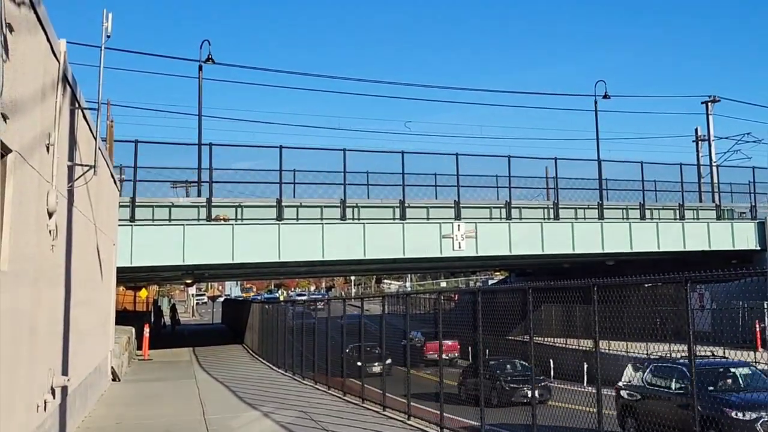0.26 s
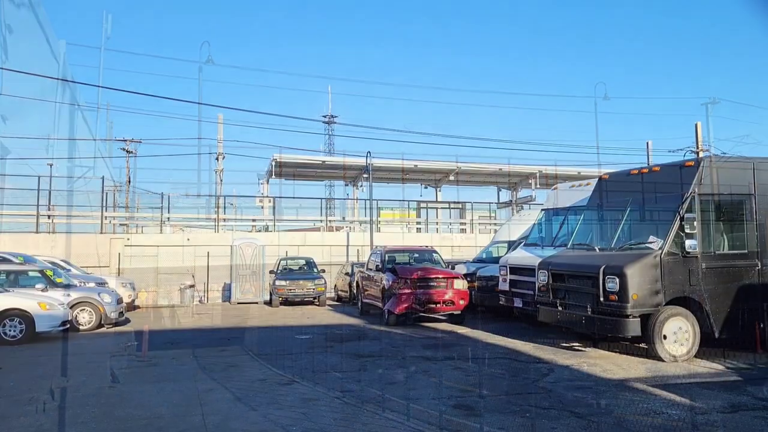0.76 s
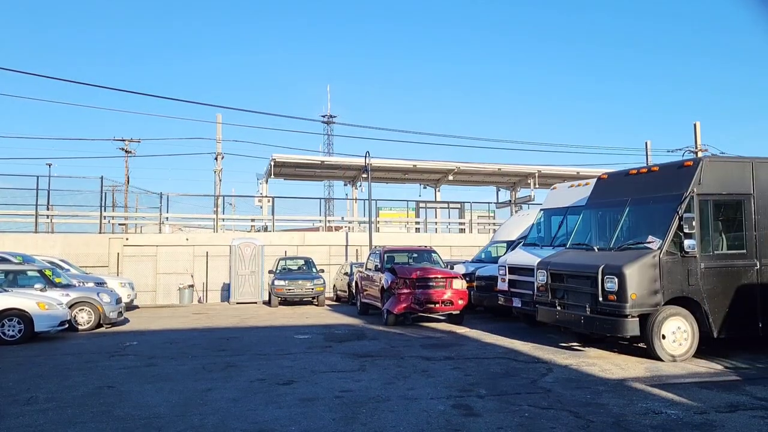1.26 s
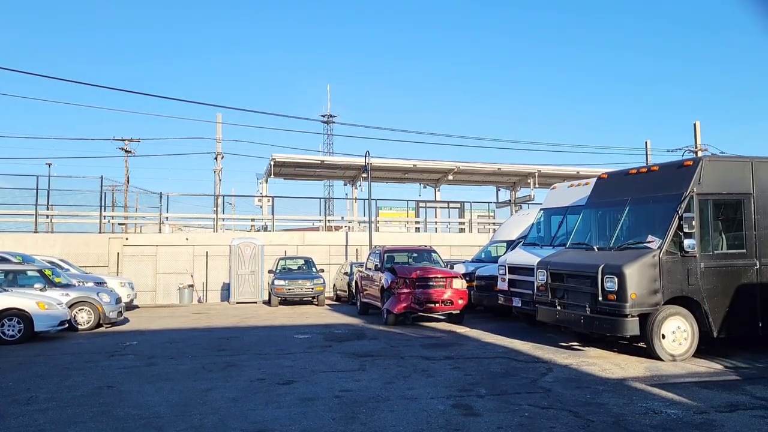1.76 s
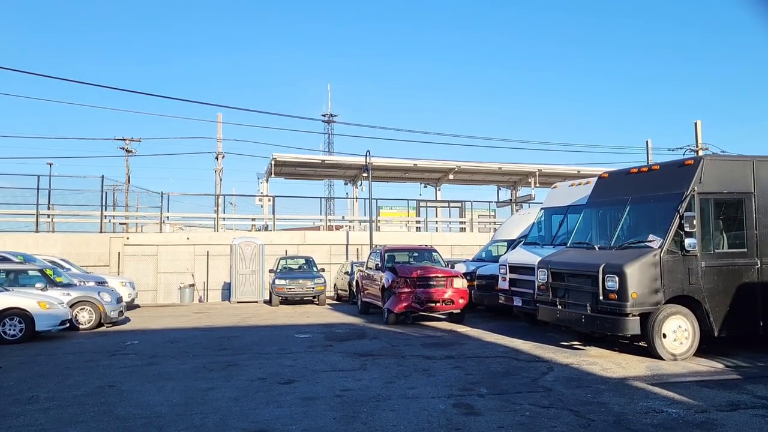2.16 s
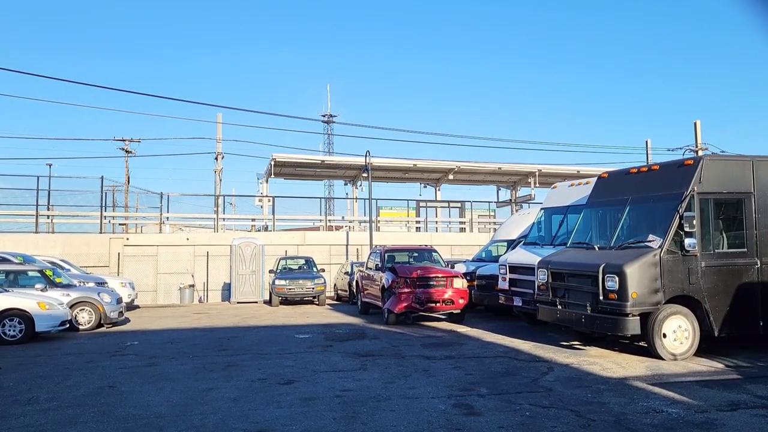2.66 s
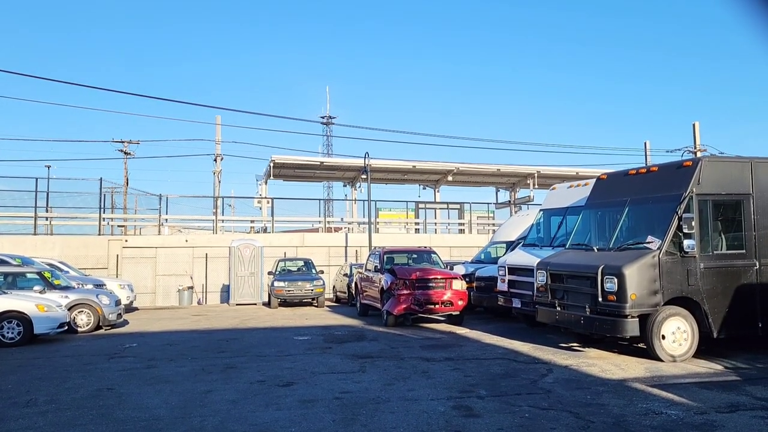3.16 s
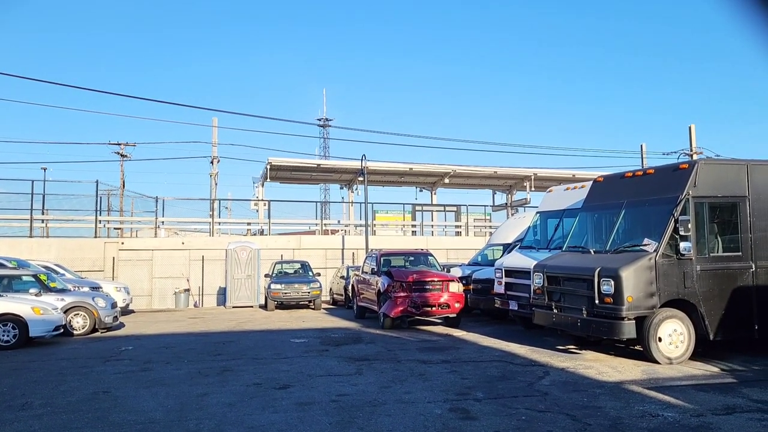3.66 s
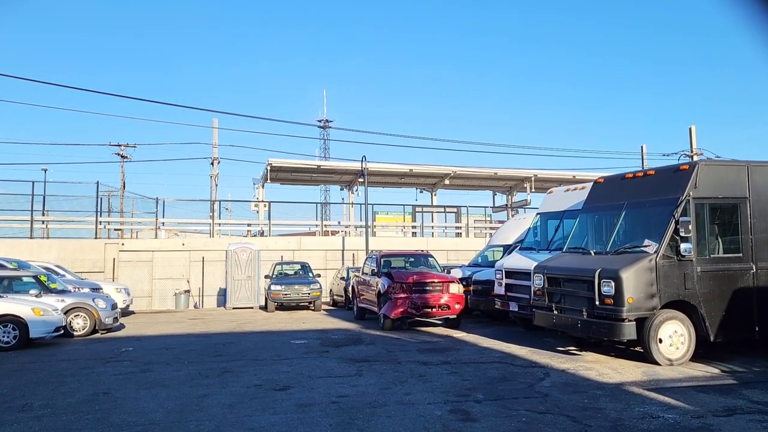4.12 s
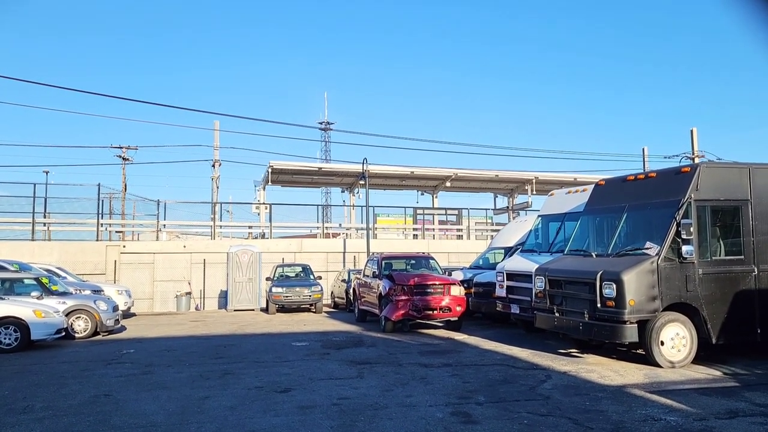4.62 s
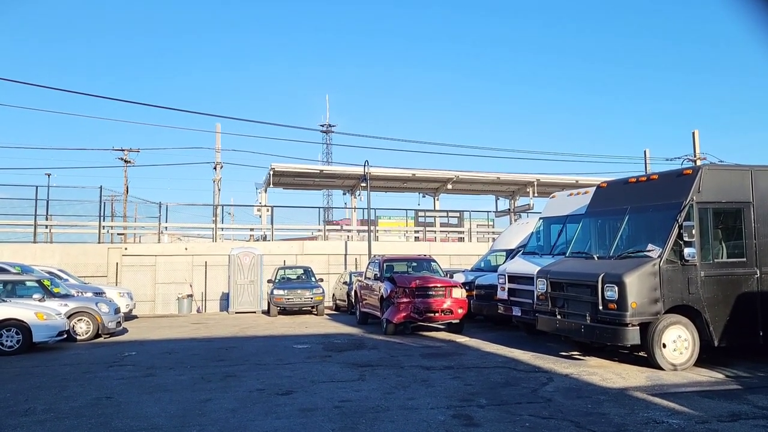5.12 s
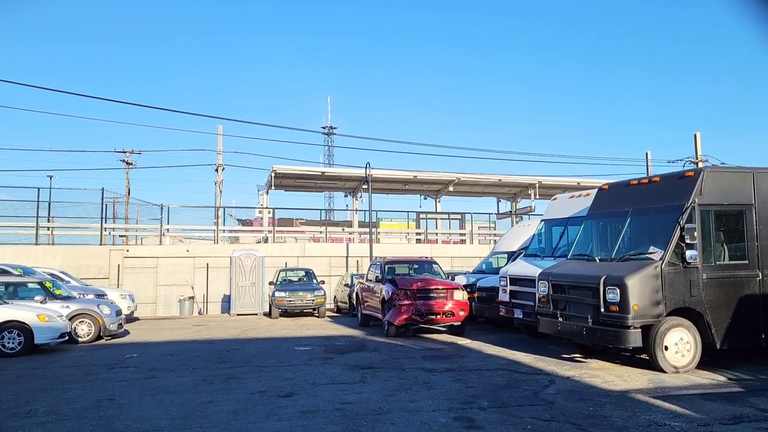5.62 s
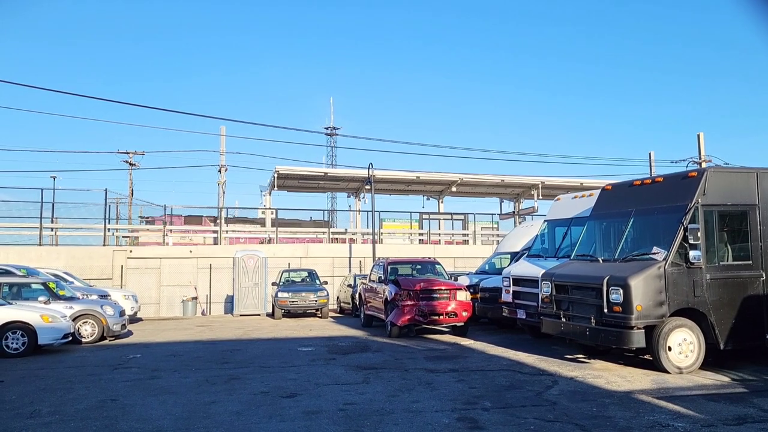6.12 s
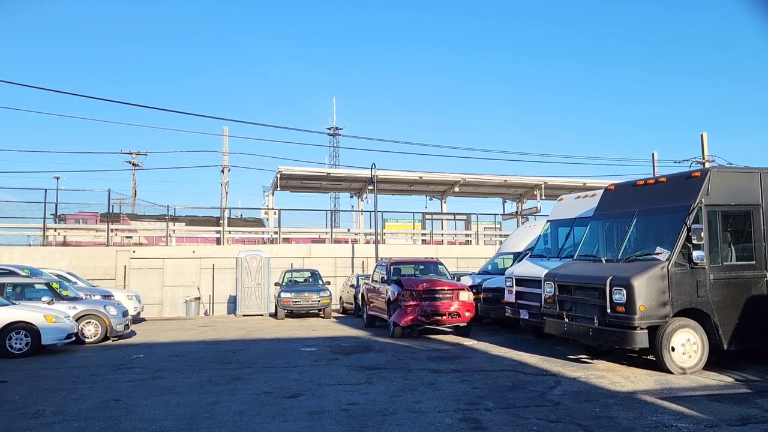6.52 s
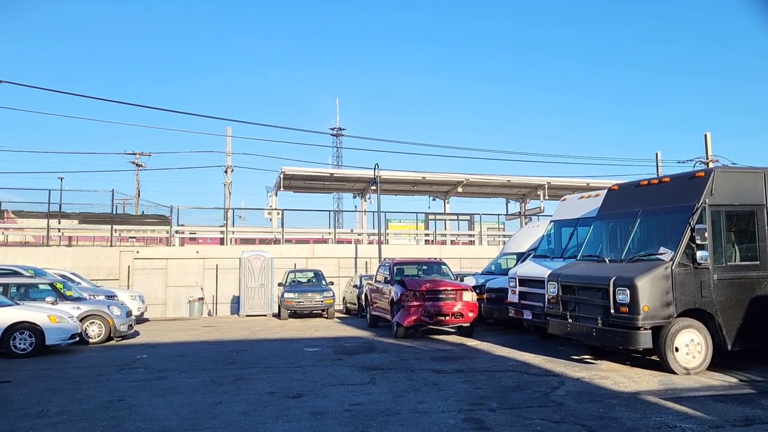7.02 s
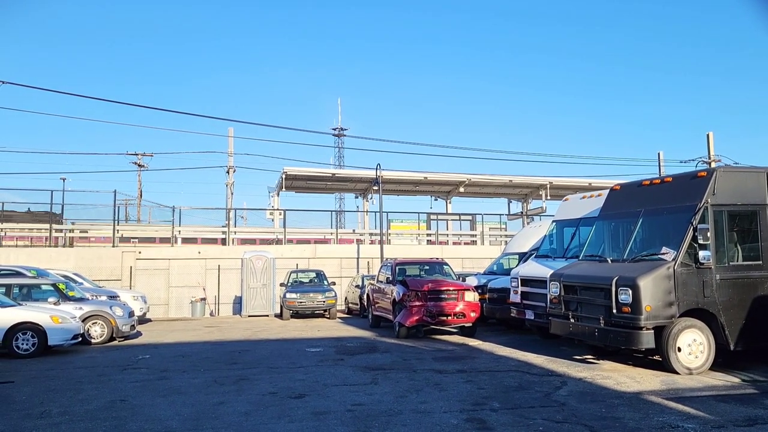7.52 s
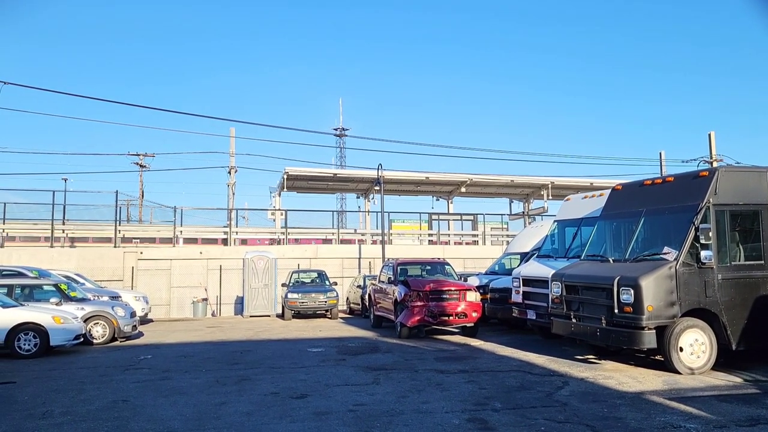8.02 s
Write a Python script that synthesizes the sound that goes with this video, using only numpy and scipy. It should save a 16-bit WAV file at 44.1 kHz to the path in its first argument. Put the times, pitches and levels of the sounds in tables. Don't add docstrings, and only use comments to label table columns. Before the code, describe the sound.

Street noise under a bridge gives way to a low beating diesel train, an early burst of compressed air, then a growing broadband roar.

```python
import sys
import numpy as np
from scipy import signal
from scipy.io import wavfile
from scipy.ndimage import uniform_filter1d

SR = 44100
rng = np.random.default_rng(int(sys.argv[2]) if len(sys.argv) > 2 else 0)


def output_pcm(signal):
    pcm = np.clip(np.atleast_2d(signal).T, -1, 1) * 32767
    wavfile.write(sys.argv[1], SR, np.round(pcm).astype(np.int16))


def nominal_scale(level):
    x = np.asarray(level, float) / 20
    return 10 ** x


N = 365148

HOP = 256
FRAMES = np.arange(N // HOP + 5) * HOP / SR
BINS = np.fft.rfftfreq(4 * HOP, 1 / SR)
TIME = np.arange(N) / SR

# t/s, nearness/0-1, lag of left port behind right/samples
PASSAGE = [
    (0, 0.25, 10),
    (3, 0, 13.5),
    (4.5, 0.36, 7.5),
    (5.5, 0.53, 0.5),
    (6.5, 0.9, -3.5),
    (8.28, 0.38, -11.5),
]
# f/Hz, likeness/0-1
PORT_LIKENESS = [(60, 0.69), (125, 0.98), (250, 0.89), (500, 0.83), (1000, 0.53), (2000, 0.1), (4000, 0.22),
                 (12000, 0.2)]
# f/Hz, left minus right/dB
PORT_BALANCE = [(60, 1.5), (99, 1.0), (160, 0.5), (270, 0.5), (450, 0.5), (740, 1.0), (1220, -1.0),
                (2010, -2.0), (3330, 2.5), (5500, 2.0), (9080, 10.5), (15000, -0.5)]
# f/Hz, level/dB
AMPLIFIER_HISS = [(7000, -128), (10000, -113), (12000, -111), (16000, -112)]
# t/s, depth/dB, length/s
GUARD_DIPS = [(1.322, 5, .007), (1.343, 2, .01), (1.37, 7, .01), (1.88, 4, .008), (2.107, 8, .009),
              (2.262, 7, .009), (2.3, 6, .012), (2.32, 3.5, .01), (2.48, 4, .008), (2.617, 4, .006),
              (4.55, 6, .011)]

# f/Hz, level/dB per Hz
STREET_COLOUR = [(40, -37), (90, -8), (150, -16.5), (300, -21.5), (600, -26.5), (1000, -32.5), (1500, -36),
                 (2000, -36), (4000, -41.5), (8000, -52.5), (10000, -65.5), (13000, -63.5), (14500, -60),
                 (16000, -75)]
STREET_DB, STREET_SAG_DB, STREET_DROP_DB = -30.5, 7.5, 9.5
TYRE_DB, TYRE_SAG_DB = -26.5, 2.5
TRUCK_HZ, TRUCK_CLIMB_HZ, TRUCK_TOP_HZ = 14.05, 1.75, 15.6
# order, peak t/s, level/dB, rise/s, fall/s
TRUCK_ORDERS = [(6.12, .55, -25, .7, .4), (10, .2, -25.5, .3, .65), (11, .2, -30, .3, .85),
                (16.2, .62, -37, .22, .25), (20, .6, -42, .3, .35)]
# f/Hz, level/dB, faded out at t/s
BRIDGE_DRONES = [(121, -27, .6), (229, -28, .52), (78, -30, .3)]

# peak t/s, level/dB, rise/s, fall/s
RUSTLES = [(0.98, -74, 0.051, .035), (1.374, -64, 0.25, .04), (1.426, -67, .01, .03),
           (1.554, -64, 0.11, 0.079), (1.7, -79, .06, .25), (2.15, -84, .016, .03), (6.9, -68, .25, .2)]
# t/s, peak level/dB, left minus right/dB
TICKS = [(0.9472, -52, 9.5), (0.9827, -56, 9.0), (1.4262, -46, 2.5), (1.5494, -57, -10.0),
         (1.7265, -58, 4.0), (3.1274, -70, 1.5), (5.3063, -58, 3.0)]

BLAST_AT, BLAST_DB = 2.622, -33.5
# f/Hz, level/dB per Hz
BLAST_COLOUR = [(900, -12), (1400, -9), (2100, -5), (3200, -9), (4300, -12.5), (5600, -18), (7200, -22),
                (8200, -12), (9200, -34), (12000, -23.5), (14500, -21), (16000, -23)]
# f/Hz, t60/s
BLAST_DECAY = [(1500, 1.2), (3000, 1), (5500, 0.53), (8500, 0.61), (12000, 0.37), (16000, .22)]
# t/s, peak level/dB, f/Hz, t60/s
VALVE_KNOCKS = [
    (2.6243, -24, 2100, .014),
    (2.6243, -28, 1600, .016),
    (2.6243, -26, 2700, .012),
    (2.6243, -29, 3500, .012),
    (3.076, -33, 2150, .035),
    (3.077, -42, 2700, .03),
]

# t/s, level under its peak/dB
ROAR_LOUDNESS = [(0.9, -11.5), (1.6, -11), (2.0, -13), (2.6, -11.5), (3.2, -10), (3.9, -8.5), (4.4, -5.5),
                 (5.0, -6), (5.7, -4.5), (6.1, -3), (6.4, -0.4), (6.7, -1.5), (7.3, -1.34), (7.8, -0.64),
                 (8.25, -2)]
# f/Hz, level/dB per Hz
NEAR_COLOUR = [(40, -14.5), (70, -19), (120, -17), (200, -21.5), (416, -26.5), (936, -22.5), (1190, -32.5),
               (2550, -36), (4250, -38), (8400, -65), (9000, -70), (12800, -84), (13300, -90), (16000, -94)]
# f/Hz, level/dB per Hz
FAR_COLOUR = [(40, -29), (70, -21.5), (123, -39), (200, -35), (363, -36), (695, -37), (1000, -44),
              (1230, -48.5), (1480, -46), (3250, -57.5), (5200, -70), (5700, -76.5), (8400, -87),
              (9200, -104)]
# f/Hz, width/Hz, lift/dB
ROAR_PEAKS = [(1030, 180, 4.5), (1395, 223, 11.5), (1926, 410, 6.5), (3980, 3840, 8.5), (5160, 280, 3.5),
              (7560, 1800, 7)]
# level at the peak/dB, slope/dB per dB of loudness
ROAR_LAYERS = [
    (-27, 1.0961),
    (-36, 0.98),
    (-51, 1.68),
    (-71, 1.98),
]
# peak t/s, level/dB, rise/s, fall/s
FAN_SURGES = [(3.1, -2, .3, 0.22), (4.05, -2.5, 0.33, 0.18), (4.5, -2.5, .1, .15), (5.05, -3, .35, 0.65),
              (5.75, -0.5, 0.31, 0.16), (6.9, -6.5, 0.26, 0.38)]
SURGE_SHARES = (0.05, .9, 1.1, 1.3)

# t/s, shaft f/Hz
GENERATOR_SHAFT = [(0.8, 47.0), (4.5, 46.57), (6.3, 46.05), (7.3, 45.41), (8.28, 44.6)]
# peak t/s, level/dB, rise/s, fall/s
SECOND_ORDER = [(1.0, -30, 0.91, .8), (2.35, -31, 0.53, 0.67), (3.45, -33, 0.32, 0.45),
                (4.5, -27, 0.24, 0.15), (5.2, -22.5, 0.36, 0.53), (5.8, -23, 0.14, 0.49),
                (7.75, -21.7, 0.64, 1)]
# peak t/s, level/dB, rise/s, fall/s
FOURTH_ORDER = [(1.55, -44, .35, 0.64), (2.75, -46, 0.33, 0.24), (4.4, -39, 0.67, 1.2),
                (6.0, -35, 0.38, 0.64), (7.1, -30, 0.42, .6)]
GENERATOR_ORDERS = (4.86, 16 / 3, 6, 8)
# level when far/dB, gain when near/dB
GENERATOR_LEVELS = [(-58.5, 9.5), (-55.5, 6.5), (-52.5, 4.5), (-53, 5)]
# order, peak t/s, level/dB, rise/s, fall/s
GENERATOR_SWELLS = [(8, 1.35, -43, .22, .25), (4.86, 1.9, -47, .7, .5), (6, 2.2, -49, .8, .7),
                    (8, 2.3, -52, .5, .8), (8, 4.35, -45, .25, .25), (4.86, 4.9, -43, .6, .6),
                    (16 / 3, 6.9, -40, .4, .6), (6, 7.3, -42, .6, .6)]
# shaft order, level at full nearness/dB
GEAR_WHINES = [(19.7, -56), (21.5, -53)]

# t/s, firing f/Hz (order 8), level/dB
DIESEL_FIRING = [(0.0, 49.6, -34), (0.6, 52.3, -28.5), (0.9, 51.7, -28.5), (1.8, 52.2, -13),
                 (2.4, 52.1, -14), (3.0, 49.4, -19), (3.3, 47.5, -28), (3.6, 45.2, -31), (3.9, 43.7, -35),
                 (4.55, 45.3, -13.5), (5.1, 48.5, -19.5), (5.7, 50.9, -28.5), (6.0, 50.5, -20.5),
                 (6.3, 50.6, -16), (6.9, 49.4, -24.5), (7.5, 48.7, -17.5), (7.8, 49.3, -25.5),
                 (8.05, 49.4, -13)]
CRANK_START = (0.642, 0.4)
# peak t/s, level/dB, rise/s, fall/s
NINTH_ORDER = [(1.6, -34, 0.78, 1), (4.0, -30, .4, 1.5), (5.4, -25, .6, 0.52), (6.25, -25.5, 0.46, 0.62),
               (7.9, -39, 2.2, 1.3)]
# t/s, lead/turns
NINTH_LEAD = [(2.5, 0.052), (5.2, 0.42), (5.95, 0.017)]
SIDE_ORDERS = (7, 11, 12, 17, 19)
# level when far/dB, gain when near/dB
SIDE_LEVELS = [(-42, 19), (-41, 3.5), (-52.5, 9.5), (-51, 17), (-62.5, 13.5)]


def evened(x):
    return x / np.sqrt(np.mean(x ** 2) + 1e-20)


def read(points, hz):
    f, value = np.transpose(points)
    return np.interp(np.log(hz + 1), np.log(f + 1), value)


def curves(rows, t):
    s, *columns = np.transpose(rows)
    return [np.interp(t, s, column) for column in columns]


def smooth(per_frame):
    return np.interp(TIME, FRAMES, per_frame)


def swells(rows, floor_db, order=2):
    power = nominal_scale(floor_db) ** 2
    for s, db, rise, fall in rows:
        distance = abs(FRAMES - s) / np.where(FRAMES < s, rise, fall)
        power = power + nominal_scale(db - 10 * distance ** order) ** 2
    return 10 * np.log10(power)


def waver(rate, depth):
    drift = sum(np.sin(2 * np.pi * (f * FRAMES + rng.random())) for f in np.geomspace(rate / 10, rate, 8))
    return depth * smooth(evened(drift))


def tone(turns, db):
    return np.sqrt(2) * nominal_scale(db) * np.cos(2 * np.pi * turns)


def band_db(field_db, lo_hz, hi_hz):
    inside = (BINS >= lo_hz) & (BINS < hi_hz)
    return 10 * np.log10((nominal_scale(field_db[inside]) ** 2).sum(0))


def noise(field_db, patchy_db, flicker_db, likeness=1):
    a, b, c, d, patches = rng.standard_normal((len(FRAMES), len(BINS), 5), np.float32).T
    patches = evened(uniform_filter1d(uniform_filter1d(patches, 10, 0), 12, 1))
    flicker = evened(uniform_filter1d(rng.standard_normal(len(FRAMES)), 3))
    flicker = flicker * np.clip(BINS / 5000, 0, 1.5)[:, None]
    same = np.clip(likeness * read(PORT_LIKENESS, BINS), 0, 1)[:, None].astype(np.float32)
    lag = curves(PASSAGE, FRAMES)[1]
    lead = np.exp(2j * np.pi * BINS[:, None] * lag / SR).astype(np.complex64)
    left = a + 1j * b
    right = same * left * lead + np.sqrt(1 - same ** 2) * (c + 1j * d)
    z = np.array([left, right])
    z *= nominal_scale(field_db + patchy_db * patches + flicker_db * flicker)
    z *= nominal_scale(np.outer([.5, -.5], read(PORT_BALANCE, BINS)))[:, :, None]
    return signal.istft(z, nperseg=4 * HOP, noverlap=3 * HOP)[1][:, :N] * np.sqrt(3 / 4)


def street():
    t = np.minimum(FRAMES, 1)
    traffic_db = STREET_DB - STREET_SAG_DB * t - STREET_DROP_DB * t ** 3
    colour = read(STREET_COLOUR, BINS)[:, None] + 0 * FRAMES
    colour = colour + traffic_db - band_db(colour, 250, 2000)
    tyre_db = traffic_db + TYRE_DB + 3 - TYRE_SAG_DB * t - band_db(colour, 5000, 16000)
    wash = noise(colour + np.outer(np.clip(BINS / 6000, 0, 1), tyre_db) + 5.5, 1.0, 0.55)
    fizz = signal.sosfiltfilt(signal.butter(2, 12500, "high", fs=SR, output="sos"), wash[0])
    wash = wash + [[.9], [0]] * fizz
    turns = np.cumsum(np.minimum(TRUCK_HZ + TRUCK_CLIMB_HZ * TIME, TRUCK_TOP_HZ)) / SR
    truck = 0
    for order, *row in TRUCK_ORDERS:
        truck += tone(order * turns + rng.random(), smooth(swells([row], -58)) + waver(8.73, 2.1))
    for order in (14, 18, 22):
        truck += tone(order * turns + rng.random(), -48 + waver(6.0, 3.0))
    drones = 0
    for hz, db, end in BRIDGE_DRONES:
        drone = tone(hz * TIME + waver(10.0, 0.11), db + waver(9.9, 1.6))
        drones += drone * np.clip((end - TIME) / 0.41, 0, 1)
    return wash + truck + drones


def handling():
    cloth = [(3000, -12.5), (6000, 4.5), (9500, -8.5), (13000, -6), (16000, -9.5)]  # f/Hz, level/dB
    colour = read(cloth, BINS)[:, None] + 0 * FRAMES
    level_db = swells(RUSTLES, -130, order=1)
    out = noise(colour + level_db - band_db(colour, 9000, 16000), 1.5, .7, .5) * nominal_scale([[-4.], [4.]])
    t = np.arange(-40, 41) / SR
    tick = np.cos(2 * np.pi * 10000 * t) * np.exp(-(t / .00004) ** 2)
    for s, db, pan_db in TICKS:
        out[:, round(s * SR):][:, :len(t)] += nominal_scale(db + 8 + np.array([[.5], [-.5]]) * pan_db) * tick
    return out


def blast():
    since = np.maximum(FRAMES - BLAST_AT, 0)
    colour = read(BLAST_COLOUR, BINS)[:, None] - 60 * since / read(BLAST_DECAY, BINS)[:, None]
    front = 1 + 0.62 * np.exp(-np.maximum(TIME - BLAST_AT, 0) / 0.013)
    gate = np.clip((TIME - BLAST_AT) / 0.0014, 0, 1) * front
    out = noise(colour + BLAST_DB - band_db(colour[:, :1], 900, 16000), .6, 0.53, 1.7) * gate
    for s, db, hz, t60 in VALVE_KNOCKS:
        t = np.maximum(TIME - s, 0)
        out += nominal_scale(db - 60 * t / t60) * np.sin(2 * np.pi * hz * t) * np.clip(t / .002, 0, 1)
    return out


def roar():
    near = np.clip(curves(PASSAGE, FRAMES)[0], 0, 1)
    bumps_db = sum(db * np.exp(-2 * ((BINS - hz) / width) ** 2) for hz, width, db in ROAR_PEAKS)
    far_part = np.outer(read(FAR_COLOUR, BINS), 1 - near)
    colour = far_part + np.outer(read(NEAR_COLOUR, BINS) + bumps_db, near)
    loud_db = curves(ROAR_LOUDNESS, FRAMES)[0]
    surge_db = swells(FAN_SURGES, 0)
    edges = [250, 1200, 5000, 9000, 16000]
    lifts = []
    for (db, slope), share, lo, hi in zip(ROAR_LAYERS, SURGE_SHARES, edges, edges[1:]):
        lifts.append(db + 3.5 + slope * loud_db + share * surge_db - band_db(colour, lo, hi))
    centres = np.log([500, 2200, 6000, 10500])
    shelves = np.array([np.interp(np.log(BINS + 1), centres, row) for row in np.eye(len(centres))])
    return noise(colour + shelves.T @ np.array(lifts), 0.66, 0.92)


def generator():
    turns = np.cumsum(curves(GENERATOR_SHAFT, TIME)[0]) / SR
    near = curves(PASSAGE, TIME)[0]
    out = tone(2 * turns, smooth(swells(SECOND_ORDER, -40)))
    out += tone(4 * turns, smooth(swells(FOURTH_ORDER, -56.5)))
    for order, (db, near_db) in zip(GENERATOR_ORDERS, GENERATOR_LEVELS):
        out += tone(order * turns + waver(3.5, 0.089), db + near_db * near + waver(4.3, 2.2))
    for order, *row in GENERATOR_SWELLS:
        out += tone(order * turns + rng.random(), smooth(swells([row], -80)) + waver(6.0, 3.0))
    for order, db in GEAR_WHINES:
        out += tone(order * turns + waver(6.0, 0.2), db + 2 - 18 * (1 - near) + waver(2.5, 4.0))
    return out


def diesel():
    firing_hz, eighth_db = curves(DIESEL_FIRING, TIME)
    firing = np.cumsum(firing_hz) / SR + CRANK_START[0]
    cycle = firing / 8
    near = curves(PASSAGE, TIME)[0]
    ninth = firing + cycle + CRANK_START[1] + curves(NINTH_LEAD, TIME)[0]
    out = tone(firing, eighth_db - 0.35)
    out += tone(ninth, smooth(swells(NINTH_ORDER, -47)) + 4.3)
    for order, (db, near_db) in zip(SIDE_ORDERS, SIDE_LEVELS):
        out += tone(order * cycle + rng.random(), db + near_db * near + waver(2.0, 3.0))
    return out


def scene():
    yard_in = np.clip((TIME - .35) / 0.55, 0, 1)
    street_out = np.clip((1.15 - TIME) / .35, 0, 1)
    engines = (diesel() + generator() * yard_in ** 2) * nominal_scale([[.8], [-.8]])
    return street() * street_out + handling() + blast() + roar() * yard_in + engines


def band_limit(x):
    return signal.sosfilt(signal.butter(12, 16180, fs=SR, output="sos"), x)


def record(dry):
    dry = signal.sosfiltfilt(signal.butter(4, 36, "high", fs=SR, output="sos"), dry, padlen=SR // 2)
    duck_db = sum(db * np.exp(-2 * ((TIME - s) / length) ** 2) for s, db, length in GUARD_DIPS)
    treble = signal.sosfiltfilt(signal.butter(2, 1200, "high", fs=SR, output="sos"), dry)
    guarded = dry - treble * (1 - nominal_scale(-duck_db))
    hiss = noise(read(AMPLIFIER_HISS, BINS)[:, None] + 0 * FRAMES, .5, .3, 0)
    edge = signal.firwin(511, 15850, window=("kaiser", 9), fs=SR)[None]
    sound = signal.oaconvolve(guarded + hiss, edge, "same")
    close = np.sin(np.pi / 2 * np.clip((N / SR - TIME) / .006, 0, 1))
    return band_limit(sound * close)


dry = scene()
out = record(dry)
output_pcm(out)
```